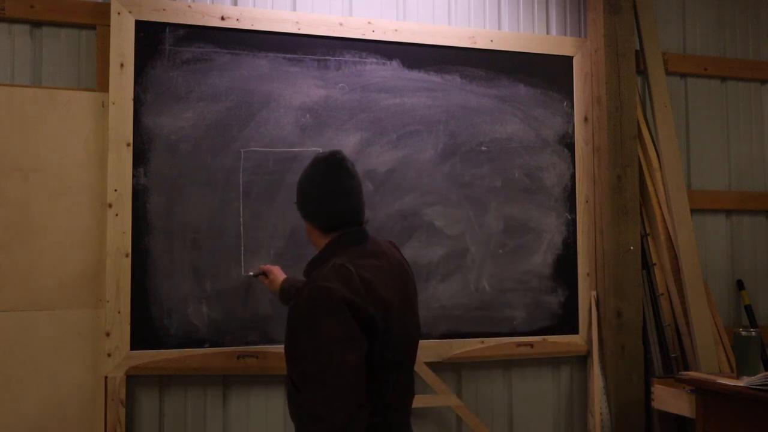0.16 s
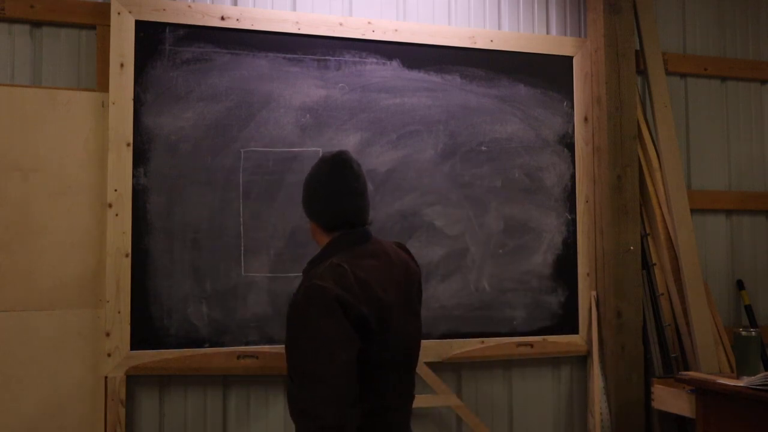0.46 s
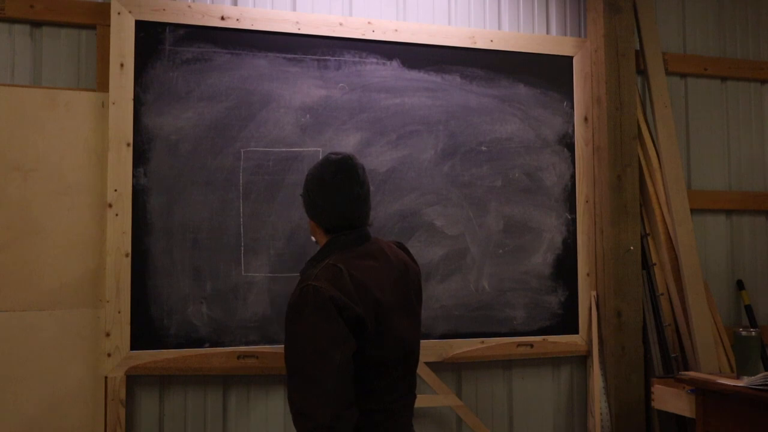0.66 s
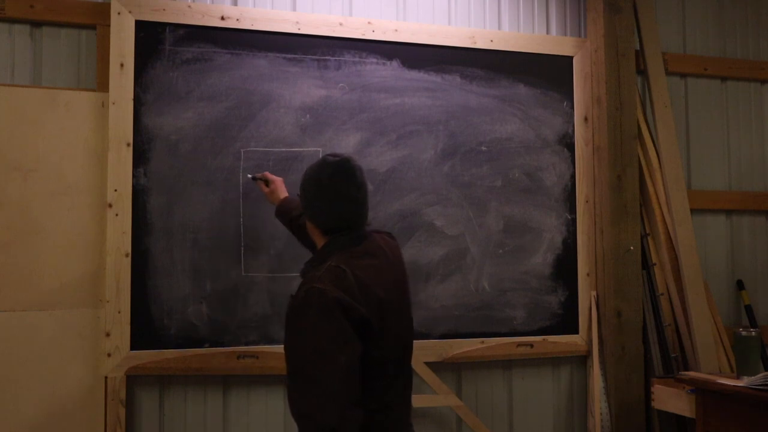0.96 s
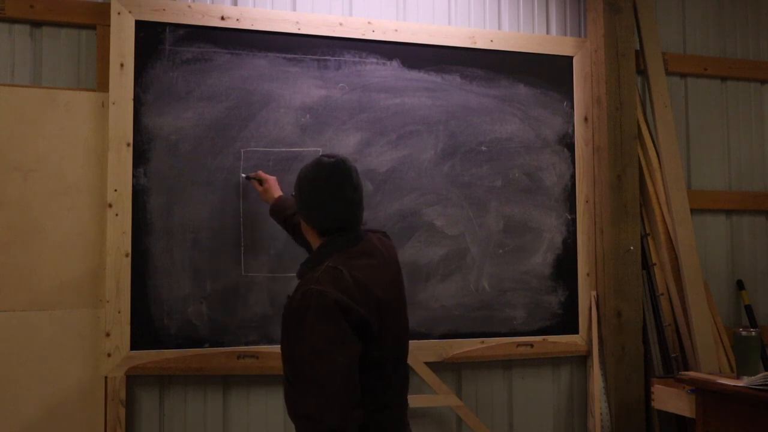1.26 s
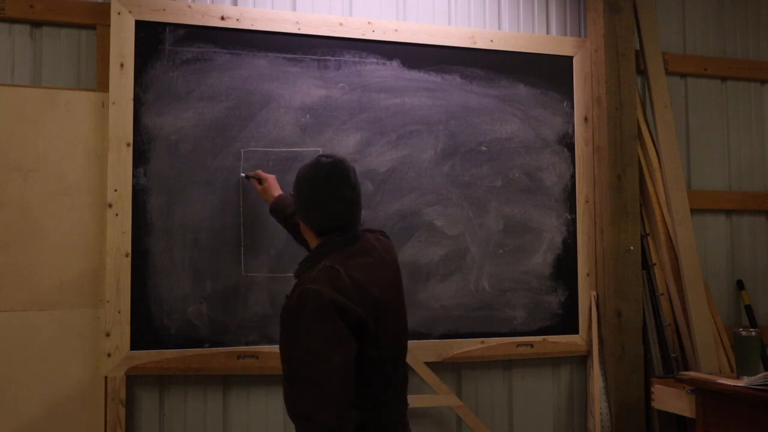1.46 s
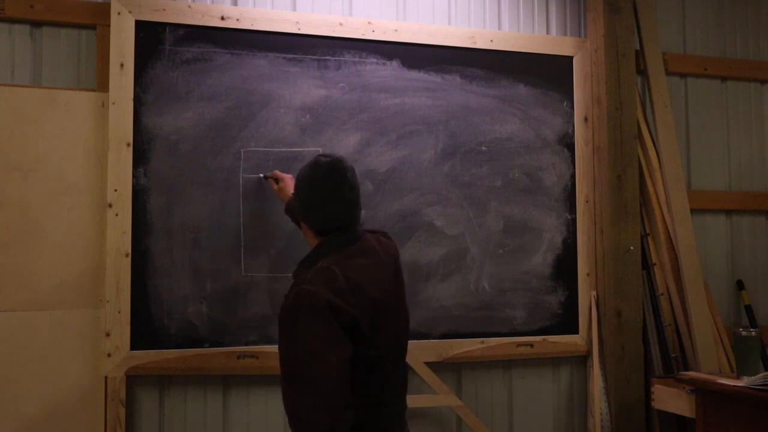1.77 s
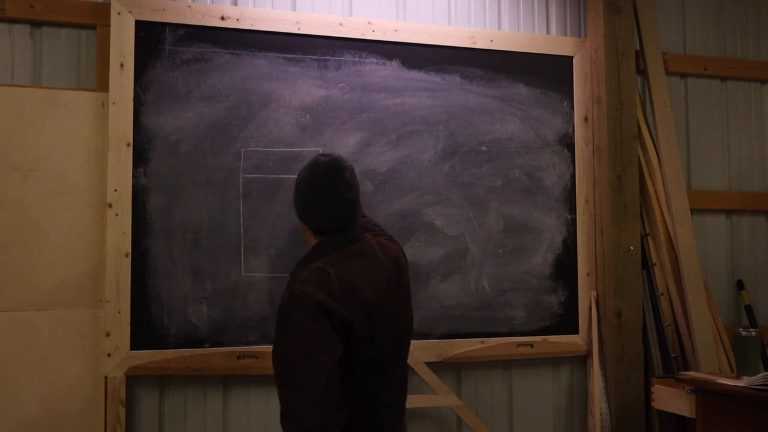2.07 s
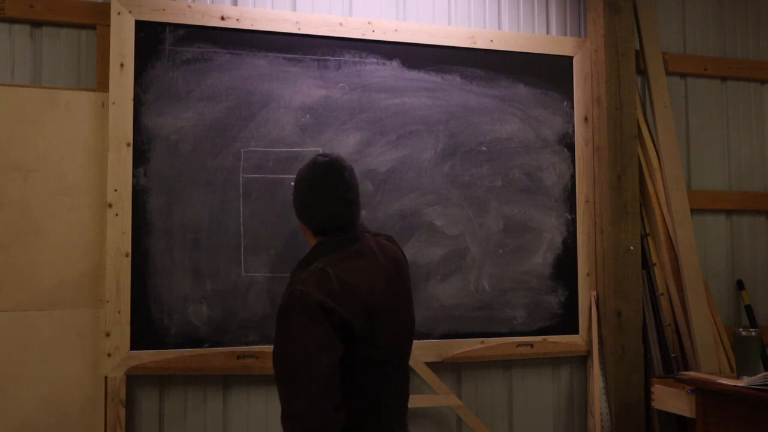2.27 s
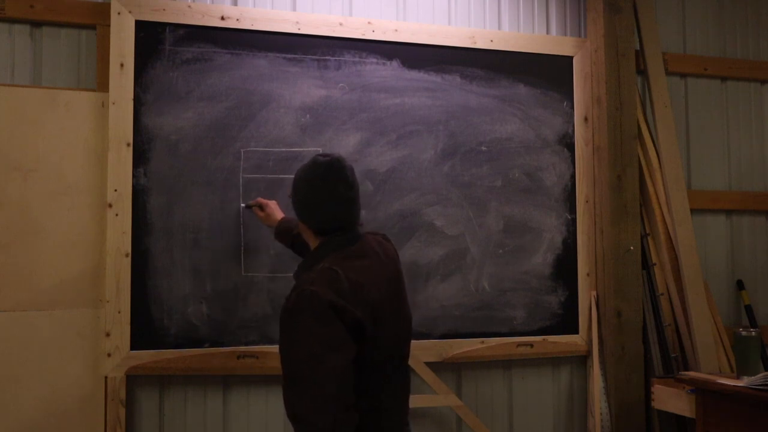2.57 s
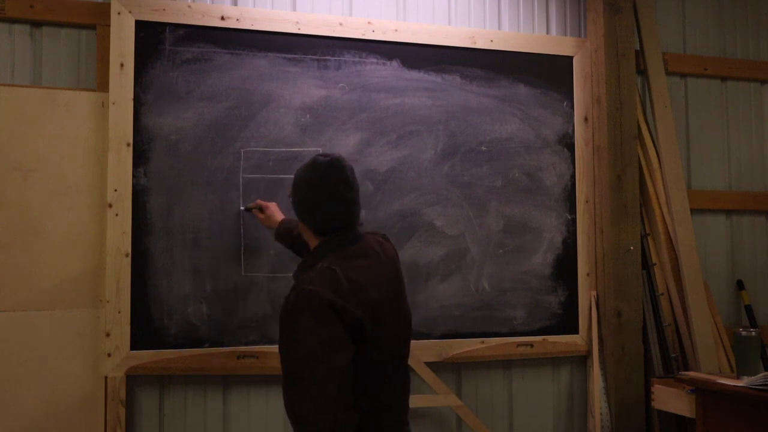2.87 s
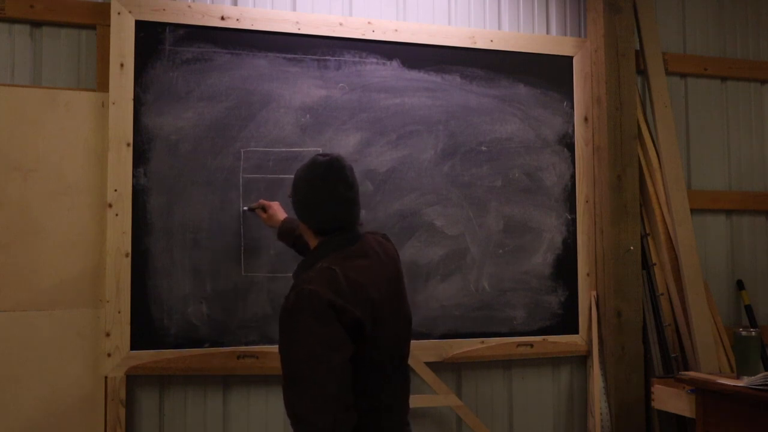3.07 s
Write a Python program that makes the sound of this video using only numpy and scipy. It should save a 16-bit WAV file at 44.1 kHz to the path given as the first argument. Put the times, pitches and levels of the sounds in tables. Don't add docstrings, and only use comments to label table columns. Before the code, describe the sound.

Chalk on a blackboard heard from within a bare, echoing workshop: a loud rumbling scrape, a pause, a sharp knock, a softer scratchy line, a second sharp knock, then another stroke beginning over low fan hum.

```python
import sys
import numpy as np
from scipy import signal
from scipy.io import wavfile

SR = 44100
rng = np.random.default_rng(int(sys.argv[2]) if len(sys.argv) > 2 else 0)


def persist_wave(psi):
    counts = np.round(np.clip(psi, -1, 1) * 32767).astype(np.int16)
    wavfile.write(sys.argv[1], SR, np.atleast_2d(counts).T)


def attenuation_scalar(level_db):
    decades = np.asarray(level_db, float) / 20
    return 10 ** decades


N = 141120


def rms_one(x):
    return x / np.sqrt(np.mean(x ** 2) + 1e-20)


def at_hz(points, hz):
    p = np.array(points)
    return np.interp(np.log(hz), np.log(p[:, 0]), p[:, 1])


def drift(rate_hz):
    r = np.exp(-80 * np.pi * rate_hz / SR)
    slow = signal.lfilter([1], [1, -2 * r, r * r], rng.standard_normal(N // 40 + 2002))[2000:]
    return np.interp(np.arange(N) / 40, np.arange(len(slow)), rms_one(slow))


def band_pass(x, order, low_hz, high_hz):
    return signal.sosfilt(signal.butter(order, [low_hz, high_hz], "band", fs=SR, output="sos"), x)


def low_pass(x, order, hz):
    return signal.lfilter(*signal.butter(order, hz, fs=SR), x)


def resonance(x, hz, width):
    r = np.exp(-np.pi * width / SR)
    return signal.lfilter(np.array([1, 0, -1]) * (1 - r * r) / 2, [1, -2 * r * np.cos(2 * np.pi * hz / SR), r * r], x)


def twice_resonant(x, hz, width):
    return resonance(resonance(x, hz, width), hz, width)


def bands(pair):
    edges_hz = 26 * 2 ** np.arange(0, 9.4, 1 / 3)
    for k, (low, high) in enumerate(zip(edges_hz, edges_hz[1:])):
        yield np.sqrt(low * high), band_pass(pair[k % 2], 2, low, high)


def coloured(pair, spectrum, patchy_db):
    return rms_one(sum(attenuation_scalar(at_hz(spectrum, hz) + patchy_db * drift(2.6)) * b for hz, b in bands(pair)))


def grains(rate_per_s, spread_db):
    size = attenuation_scalar(spread_db * np.minimum(rng.exponential(1, (2, N)), 5)) * rng.standard_normal((2, N))
    return size * (rng.random((2, N)) < rate_per_s / SR) + 1e-18


def stroke_levels():
    # t/s, grit hiss from speed/dB, board rumble from pressure/dB, grit treble above about
    # 7 kHz/dB (negative dulls)
    lines = [
        [(0, -50, -40.5, -1), (.04, -55, -50.5, -8), (.12, -81, -52.5, -7), (.16, -86, -63, -8)],
        [(.19, -59.5, -60, 3.5), (.30, -52.5, -42, 2.5), (.38, -50.5, -42, -0.5), (.44, -49.5, -37, -9),
         (.49, -57, -40.5, 3.5), (.57, -49.5, -37, -6.5), (.64, -62, -42.5, -3), (.70, -67, -57.5, -8),
         (1.1, -68, -61.5, -6)],
        [(1.54, -71, -62, 5), (1.68, -59, -50, 5.5), (1.80, -59, -50, 7.5), (1.89, -55.5, -45, 5.5),
         (1.95, -50.5, -42, -3), (2.04, -64, -45, 11.5), (2.17, -58.5, -46, 4.5), (2.24, -71, -59, 8),
         (2.32, -74, -68, -5)],
        [(2.98, -89, -53.5, -8), (3.06, -65.5, -50, -2), (3.13, -61, -49.5, 1), (3.19, -55, -47.5, 4),
         (3.2, -54, -42, 2)],
    ]
    # board ridge/dB, stick ring/dB
    grip = [(7, -12), (4, -4.5), (2.5, 0), (1, -7)]
    # t/s, grit/dB, board/dB
    judders = [(.27, 2, 1.5), (.30, 1, 1.5), (.345, 2, -0.5), (.38, 3, 2), (.435, 3, 1), (.50, 3.5, 3.5),
               (.558, 0, 1), (.585, -0.5, 3), (.612, 2.5, 3), (.645, 1, 1), (1.74, 1, 1), (1.85, 1, -0.5),
               (2.12, 1.5, 2.5), (3.125, 1.5, 1.5)]
    judder_s = 0.013
    t = np.arange(N) / SR
    hiss, rumble, dull_db, ridge_db, ring_db = np.zeros((5, N))
    for rows, (line_ridge_db, line_ring_db) in zip(lines, grip):
        s, line_hiss_db, line_rumble_db, line_dull_db = np.transpose(rows)
        on = (t >= s[0] - .01) & (t <= s[-1] + .01)
        hiss += on * attenuation_scalar(np.interp(t, s, line_hiss_db))
        rumble += on * attenuation_scalar(np.interp(t, s, line_rumble_db))
        dull_db += on * np.interp(t, s, line_dull_db)
        ridge_db += on * line_ridge_db
        ring_db += on * line_ring_db
    for s, grit_db, board_db in judders:
        bite = np.exp(-((t - s) / judder_s) ** 2)
        hiss *= attenuation_scalar(grit_db * bite)
        rumble *= attenuation_scalar(board_db * bite)
    return hiss, rumble, dull_db, ridge_db, ring_db


def crumbling_grit(ring_db):
    # f/Hz, level/dB per Hz
    grit_colour = [(820, -12), (1400, -7.5), (2640, 2), (3190, -7.5), (4030, -0.5), (5340, -8.5),
                   (8650, -13.5), (12500, -15), (15500, -25)]
    # f/Hz, width/Hz, level/dB
    stick_rings = [(1814, 203, 1.5), (2231, 40, -8), (3190, 430, -7), (4540, 78, -11.5), (5540, 600, -7),
                   (6500, 270, -12.5), (7330, 390, -4.5), (8170, 150, -2), (10500, 470, -7.5),
                   (11830, 360, -10)]
    # f/Hz, width/Hz, depth/0-1
    gaps = [(2535, 360, 0.52), (4020, 380, 0.73), (8400, 600, 0.46)]
    grit = coloured(grains(8200, spread_db=0), grit_colour, patchy_db=1.0)
    ringing = 0
    for hz, width, db in stick_rings:
        ringing = ringing + attenuation_scalar(db + ring_db + 2.5 * drift(2.2)) * twice_resonant(grit, hz, 2 * width)
    grit = rms_one(grit + ringing)
    for hz, width, depth in gaps:
        grit = grit - depth * resonance(grit, hz, width)
    return grit


def board_shake():
    # f/Hz, level/dB per Hz
    rumble_colour = [(59, -63), (100, -17), (188, -5.5), (278, -9.5), (374, -8.5), (678, -9.5), (1090, -10),
                     (1200, -13), (2200, -31.5), (2860, -38), (4840, -120)]
    # f/Hz, width/Hz, level/dB
    panel = [(190, 81, -4), (744, 20, -10), (1100, 110, -11.5)]
    shake = coloured(grains(2300, spread_db=1.8), rumble_colour, patchy_db=2.1)
    return rms_one(shake + sum(attenuation_scalar(db) * resonance(shake, hz, width) for hz, width, db in panel))


def lingering(level, t60_s):
    r = attenuation_scalar(-120 / (t60_s * SR))
    return np.sqrt(signal.lfilter([1 - r], [1, -r], level ** 2, zi=[level[0] ** 2])[0])


def strokes():
    hiss, rumble, dull_db, ridge_db, ring_db = stroke_levels()
    grit, shake = crumbling_grit(ring_db), board_shake()
    low = low_pass(grit, 1, 7000)
    dry = attenuation_scalar(4.5 + 0.3 * drift(17)) * hiss * (low + attenuation_scalar(dull_db) * (grit - low))
    dry += attenuation_scalar(-0.85 + 0.84 * drift(30)) * rumble * shake
    ridge = rms_one(twice_resonant(rng.standard_normal(N), 1110, 280))
    dry += attenuation_scalar(-3 + ridge_db + 0.72 * drift(9.1)) * hiss ** 0.73 * rumble ** 0.35 * ridge
    t60_s, wet_db = 0.85, -2.5
    wet = lingering(rumble, t60_s) * low_pass(shake[::-1], 1, 1500)
    wet += lingering(hiss, 0.92 * t60_s) * low[::-1]
    return dry + attenuation_scalar(wet_db) * wet


def songs():
    # t/s, length/s, f/Hz, glide/Hz, level/dB
    sung_modes = [(.22, 0.12, 850, 9.5, -50.5), (0.24, 0.23, 1090, 5, -47.5), (.32, .11, 974, 5, -47),
                  (0.348, .13, 721, 8, -45), (.54, 0.083, 1115, -20, -45.5), (0.24, .08, 1680, -20, -55),
                  (.26, .20, 3550, 29.5, -61), (.27, .14, 3110, -40, -62), (.28, .16, 5240, 59, -62),
                  (.27, .13, 7390, -80, -64), (.22, .22, 8150, -30, -63), (.24, .16, 13000, -300, -66),
                  (.30, .14, 11100, -200, -62), (.47, .06, 3300, 40.5, -54), (.47, 0.069, 1800, 30, -51),
                  (.52, .08, 7100, 100, -65), (1.64, .10, 3050, 60, -67), (1.70, .13, 2800, 89.5, -62),
                  (1.70, .08, 5100, -100, -59), (1.73, .14, 7520, -60, -63), (1.87, .18, 3190, -170, -56),
                  (1.90, .12, 1830, -20, -58), (1.89, .08, 2260, -20.5, -58), (2.05, 0.136, 3250, 40, -60),
                  (2.04, 0.11, 1800, 21.5, -63), (2.08, .12, 5400, -80, -62), (3.11, 0.11, 7650, 30, -67),
                  (3.10, .07, 6400, -80, -67), (3.13, .08, 3150, 60, -63)]
    wobble, flutter_db = 0.00896, 3.5
    out, t = np.zeros(N), np.arange(N) / SR
    for s, length, hz, glide_hz, db in sung_modes:
        u = np.clip((t - s) / length, 0, 1)
        pitch_hz = (hz + glide_hz * (u - .5)) * (1 + wobble * drift(90.0))
        swell = attenuation_scalar(db + 1.1 + flutter_db * drift(36.0)) * np.sin(np.pi * u) ** 0.63
        out += swell * np.sin(2 * np.pi * np.cumsum(pitch_hz) / SR)
    return out


def snag():
    # f/Hz, width/Hz, level/dB
    crunch = [(4420, 250, -41), (5880, 310, -41), (6300, 250, -49), (8100, 530, -48)]
    t = np.arange(N) / SR - 1.907
    burst = (t > 0) * (1 - np.exp(-np.abs(t) / 0.0048)) * attenuation_scalar(-60 * np.abs(t) / 0.07)
    return burst * sum(attenuation_scalar(db - 1.5) * rms_one(resonance(rng.standard_normal(N), hz, w)) for hz, w, db in crunch)


def knock_body(contact_ms, touches):
    # f/Hz, level/dB, t60/s
    modes = [(364, 8.5, 0.24), (548, 5.5, 0.45), (744, 7, 1.1), (840, 13.5, 0.35), (991, 12, 0.96),
             (1100, -21, 0.55), (1190, -13, 0.036), (1430, 5, 0.54), (1510, 1, 0.45), (1814, -47, 1.5),
             (2300, -29, 0.28), (2360, -32, 0.5)]
    # lag/s, level/dB
    wall_echoes = [(0.0144, -5), (.030, -6.5), (.042, -12), (.058, -14)]
    mode_trim_db, damping, longest_s, rebound = -49.5, 0.45, 0.21, 0.42
    t = np.arange(SR) / SR
    n = np.arange(int(.008 * SR)) / SR / (contact_ms / 1000)
    push = np.sin(np.pi * np.minimum(n, 1)) ** 2 - rebound * np.sin(np.pi * np.clip((n - 1) / 2.56, 0, 1))
    body = touches.copy()
    for hz, mode_db, t60 in modes:
        luck_db = rng.uniform(-3, 3)
        fade_db = 60 * t / (damping * min(t60, longest_s))
        level = attenuation_scalar(mode_trim_db + mode_db + luck_db - fade_db)
        body += level * np.sin(2 * np.pi * hz * t) * rng.choice([-1, 1])
    for lag_s, echo_db in wall_echoes:
        start = int(lag_s * SR * rng.uniform(.9, 1.1))
        body[start:][:400] += attenuation_scalar(echo_db) * rng.choice([-1, 1]) * body[:400]
    return signal.fftconvolve(body, push)[:SR]


def stick_tick():
    # f/Hz, width/Hz, level/dB
    struck_rings = [(1990, 540, 23), (3050, 170, 14), (4750, 180, -10), (5840, 290, -24)]
    t = np.arange(SR) / SR
    tick = band_pass(rng.standard_normal(SR), 3, 1900, 7500)
    tick = tick + sum(attenuation_scalar(db) * resonance(tick, hz, width) for hz, width, db in struck_rings)
    fade = attenuation_scalar(-60 * t / 0.0043) + attenuation_scalar(-60 * t / 0.037) + attenuation_scalar(-16.5 - 60 * t / 1.2)
    return tick * (1 - np.exp(-t / .0003)) * fade


def hall(rise_s):
    # f/Hz, level/dB per Hz
    tail_colour = [(71, -46), (120, -15), (172, -8.5), (632, -3), (758, -7), (1210, -8), (2360, -33),
                   (3160, -25), (9000, -57), (11700, -80), (19800, -120)]
    # f/Hz, t60/s
    hall_decay = [(150, 0.81), (400, 0.63), (1000, 0.53), (2700, 0.38), (7000, 0.06), (14000, 0.05)]
    t, echo = np.arange(SR) / SR, 0
    for hz, band in bands(rng.standard_normal((2, SR))):
        echo = echo + attenuation_scalar(at_hz(tail_colour, hz) - 60 * t / at_hz(hall_decay, hz)) * band
    echo = echo * (1 - np.exp(-t / rise_s)) ** 2
    return echo / np.sqrt(np.sum(echo ** 2))


def taps():
    # t/s, peak/dB, contact/ms, bright tick/dB, hall/dB
    knocks = [
        (1.4202, -16.5, 0.6, -52, -19),
        (1.56, -32, 1.8, -74, -31.5),
        (1.909, -40, 1.37, -50.5, -27.5),
        (2.6959, -15, 0.52, -46.5, -17.5),
        (2.866, -35, 1.61, -60, -25.5),
    ]
    bounces_db = [-14, -8, -6, -2, -8]
    out = np.zeros(N + 2 * SR)
    for (s, db, contact_ms, tick_db, hall_db), bounce_db in zip(knocks, bounces_db):
        touches = np.zeros(SR)
        touches[[0, int(.003 * SR)]] = 1, attenuation_scalar(bounce_db)
        sound = attenuation_scalar(db) * knock_body(contact_ms, touches)
        tail_hz = min(4500 / (contact_ms + .14) ** 1.9, 15000)
        sound += attenuation_scalar(hall_db + 24.5) * low_pass(hall(0.0042 * contact_ms), 2, tail_hz)
        sound += attenuation_scalar(tick_db) * stick_tick()
        sound += attenuation_scalar(db - 9.5) / contact_ms ** 2 * band_pass(touches, 2, 2200, 7000)
        out[int(s * SR):int(s * SR) + SR] += sound
    return signal.sosfilt(signal.butter(2, 170, "high", fs=SR, output="sos"), out[:N])


def flexes():
    # t/s, level/dB, f/Hz, length/s
    panel_flexes = [(.408, -32.5, 197, 0.065), (.49, -41.5, 200, 0.034), (0.37, -40, 260, 0.059),
                    (.545, -36.5, 190, 0.1), (.57, -35, 150, 0.078), (0.58, -41.5, 76, .13),
                    (0.85, -45.5, 82, .1), (1.915, -34, 179.5, 0.065), (2.698, -42, 193.8, 0.085),
                    (2.867, -39.5, 680, 0.046), (2.6965, -35.5, 2116, 0.0097), (2.885, -42, 510, 0.06),
                    (1.41, -32, 950, 0.034), (1.44, -35, 600, 0.045), (1.429, -37.5, 293, 0.052),
                    (2.67, -34, 728, 0.031), (2.725, -41, 500, .05), (2.871, -39.5, 810, 0.026)]
    out, t = np.zeros(N), np.arange(N) / SR
    for s, db, hz, length in panel_flexes:
        u = np.maximum(t - s, 0) / (length / 3)
        out += attenuation_scalar(db - 0.5) * u * np.exp(1 - u) * np.sin(2 * np.pi * hz * (t - s))
    return out


def air():
    # f/Hz, level/dB per Hz
    room_colour = [(18, -38), (30, -21), (53, -6), (120, -8.5), (161, -2), (301, -13), (537, -12.5),
                   (1210, -26.5), (15800, -35.5)]
    # f/Hz, width/Hz, level/dB
    fan_tones = [(56.5, 5.1, -62), (77.7, 10.4, -66.5), (158.6, 3.7, -55), (199.7, 12, -57.5),
                 (3245, 290, -74.5)]
    out = attenuation_scalar(-49.5) * coloured(rng.standard_normal((2, N)), room_colour, patchy_db=.15)
    for hz, width, db in fan_tones:
        tone = twice_resonant(rng.standard_normal(N + SR), hz, width)[SR:]
        out += attenuation_scalar(db) * rms_one(tone)
    return out


def scene():
    return (strokes() + songs() + snag() + taps() + flexes() + air())[None]


def band_limit(x):
    return signal.sosfilt(signal.butter(12, 15980, fs=SR, output="sos"), x)


def record(dry):
    cut = signal.ellip(12, .3, 70, 15730, fs=SR, output="sos")
    mix = signal.sosfilt(cut, dry)
    return band_limit(mix)


dry = scene()
out = record(dry)
persist_wave(out)
```